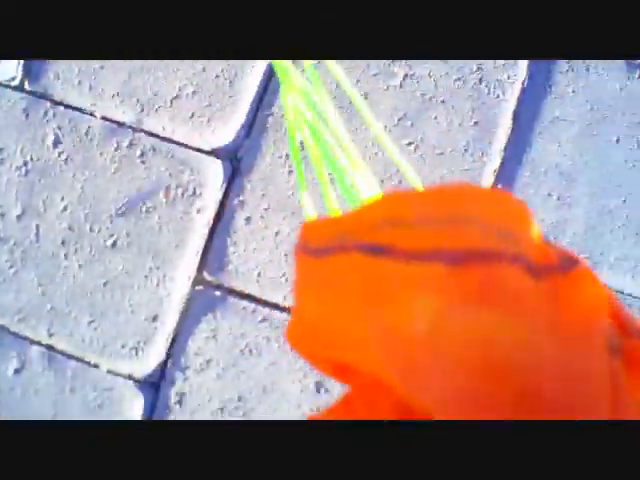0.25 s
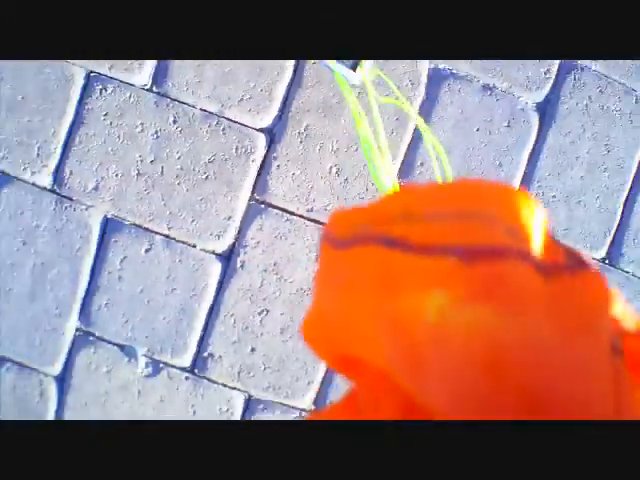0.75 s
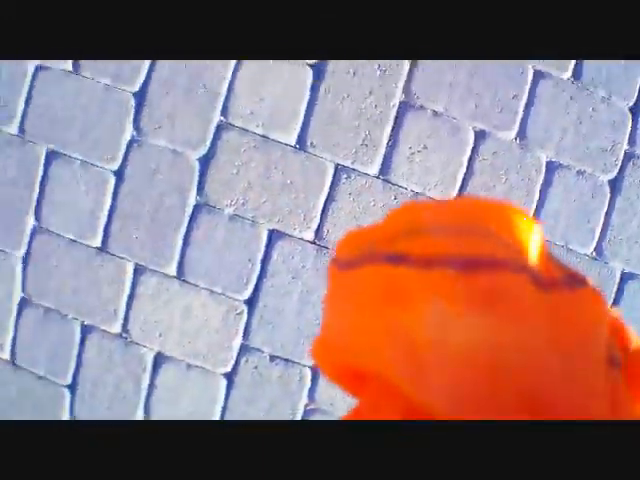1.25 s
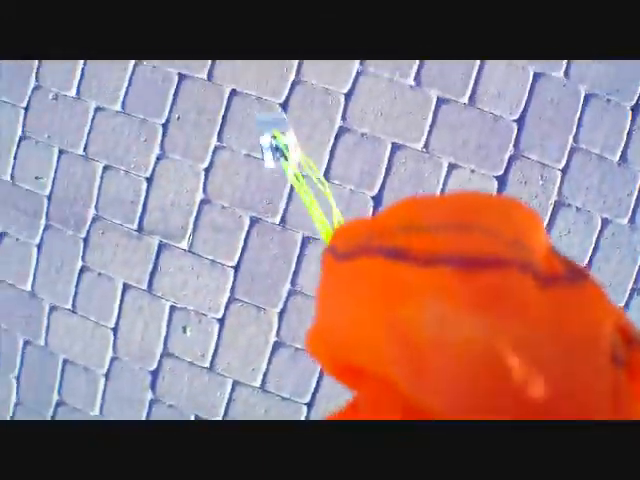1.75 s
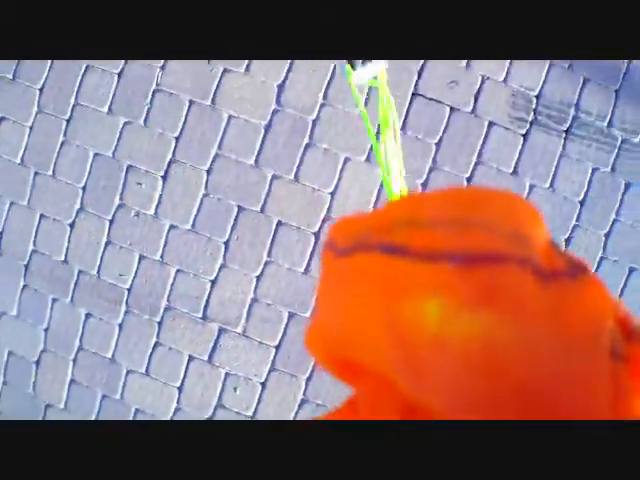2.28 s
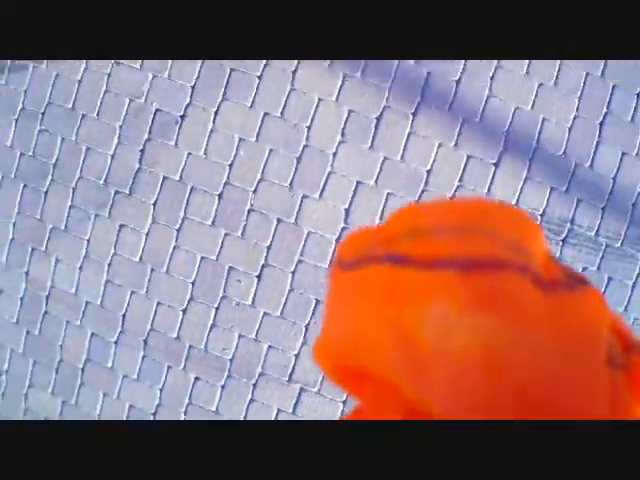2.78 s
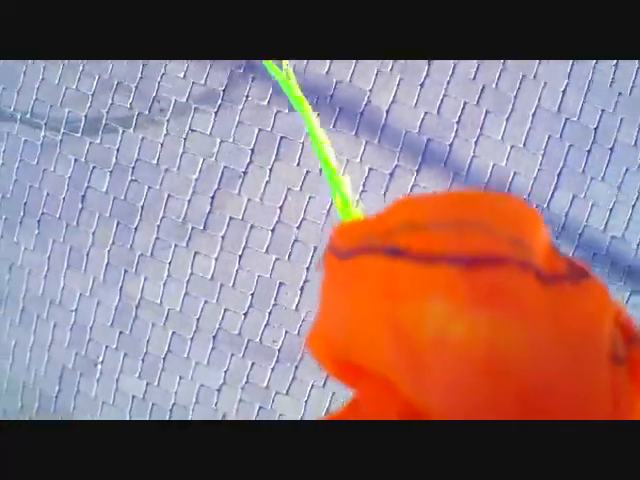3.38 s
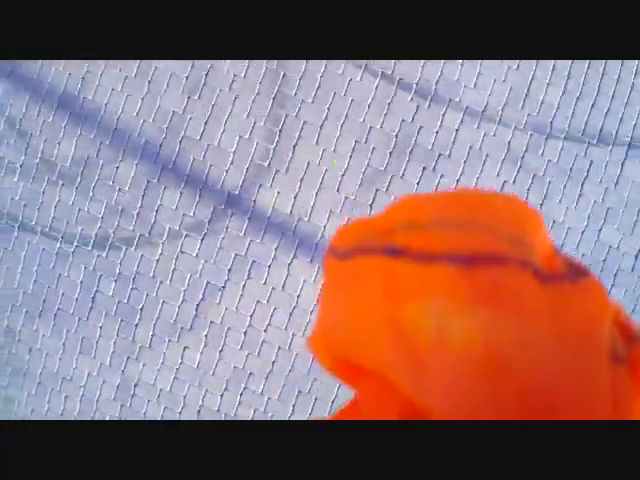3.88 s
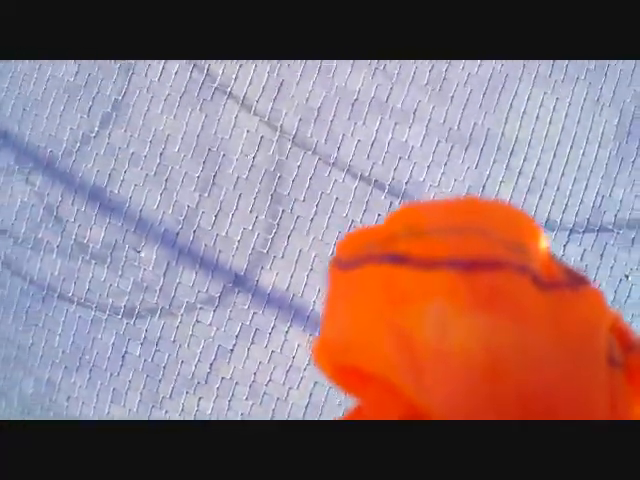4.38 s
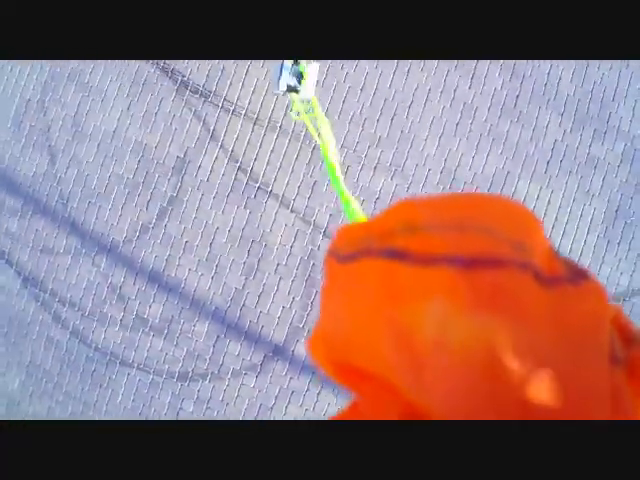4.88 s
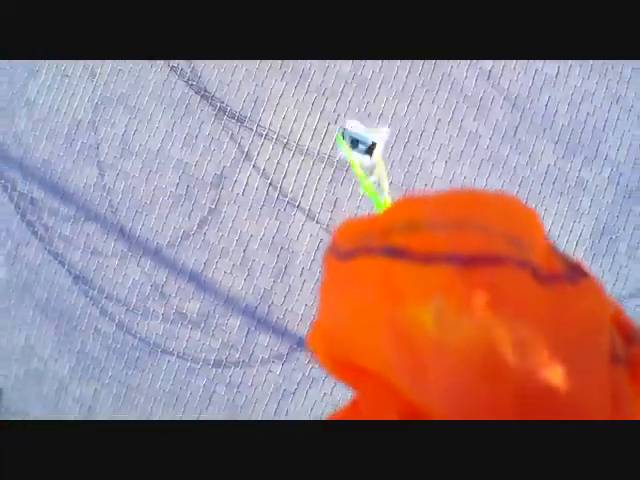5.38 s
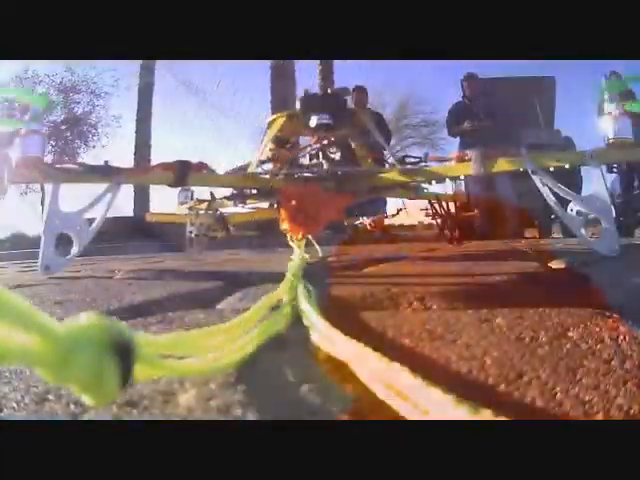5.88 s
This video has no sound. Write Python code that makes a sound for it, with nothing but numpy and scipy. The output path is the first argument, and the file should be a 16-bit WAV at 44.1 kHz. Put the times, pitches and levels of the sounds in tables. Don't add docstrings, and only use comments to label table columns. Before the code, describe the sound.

Close drone rotors buzz in wavering, beating tones under a thin electronic whistle, before fading into dull, overloaded wind noise at the end.

```python
import sys
import numpy as np
from scipy import signal
from scipy.fft import rfft, irfft
from scipy.io import wavfile
from scipy.ndimage import uniform_filter1d, map_coordinates

SR = 44100
rng = np.random.default_rng(int(sys.argv[2]) if len(sys.argv) > 2 else 0)


def level_to_linear(level):
    exponent = np.asarray(level, float) / 20
    return 10 ** exponent


def generate_wav(signal):
    frames = np.transpose(np.atleast_2d(signal))
    scaled = np.clip(frames, -1, 1) * 32767
    pcm = np.round(scaled).astype(np.int16)
    wavfile.write(sys.argv[1], SR, pcm)


N = 271079
TIME = np.arange(N) / SR


def rms_one(x):
    return x / np.sqrt(np.mean(x ** 2) + 1e-20)


def in_time(rows):
    seconds, *columns = np.transpose(rows)
    return [np.interp(TIME, seconds, column) for column in columns]


def drift(rate):
    points = rng.standard_normal(4000)
    return map_coordinates(points, [5 + TIME * 2 * rate], order=2)


def coloured(points):
    hz, db = np.transpose(points)
    bins = np.arange(N // 2 + 1) * SR / N + 1
    gain = level_to_linear(np.interp(np.log(bins), np.log(hz), db))
    return rms_one(irfft(rfft(rng.standard_normal(N)) * gain, N))


def split_band(x, kind, hz, order=2):
    return signal.sosfilt(signal.butter(order, hz, kind, fs=SR, output="sos"), x)


def shaft_speeds():
    # (time [s], shaft speed [rev/s])
    near_speed = [(0, 80.8), (.35, 81.8), (.55, 86.2), (.72, 85.4), (.97, 88.2), (1.28, 83.2), (1.9, 83.3),
                  (2.3, 90.1), (2.65, 90), (2.96, 87.8), (3.17, 89.9), (3.42, 88.5), (3.87, 91.7),
                  (4.2, 89.5), (4.85, 86.6), (5.22, 90.1), (5.55, 89.7), (6.15, 87.7)]
    # (time [s], shaft speed [rev/s])
    slow_speed = [(0, 76.6), (.3, 78), (.78, 78.3), (.98, 75.5), (1.4, 81.2), (1.7, 82.2), (2, 81.7),
                  (2.2, 80.5), (2.5, 81.1), (2.7, 80.1), (3.13, 85.6), (3.5, 85.6), (3.72, 83.1), (4, 81.3),
                  (4.85, 83.2), (5.3, 82.3), (5.52, 81.3), (6.15, 82.1)]
    # (time [s], shaft speed [rev/s])
    far_speed = [(0, 82.2), (.22, 83.5), (.68, 81.1), (1.3, 85.9), (1.5, 85.5), (1.83, 86.9), (2.17, 84.4),
                 (2.8, 86.5), (3.15, 89.6), (3.45, 90.7), (3.7, 90.4), (3.87, 89), (4.1, 90.1), (4.5, 88.6),
                 (4.83, 86.8), (5.2, 87.3), (5.5, 89.8), (6.15, 87.7)]
    return [in_time(rows)[0] for rows in (near_speed, slow_speed, far_speed)]


def turns(rev_per_s, unsteady):
    speed = uniform_filter1d(rev_per_s, size=4000) * (1 + unsteady * drift(25))
    return 2 * np.pi * np.cumsum(speed) / SR


def strong_tones(angles, speeds, flutter_db, swell_db):
    whine_tones = [(0, 10), (0, 11), (0, 13), (0, 14), (0, 15), (1, 13), (1, 13), (0, 42), (1, 42), (2, 42)]
    # (centre [Hz], width [Hz], level on top [dB])
    arm_peaks = [(904, 96, -58.5), (928, 140, -57.5), (1221, 163, -39), (1236, 136, -44.5),
                 (1265, 81, -43.5), (1005, 99, -47), (1103, 77, -46.5), (3564, 426, -47),
                 (3605, 218, -40.5), (3590, 210, -52)]
    out = np.zeros(N)
    for (rotor, multiple), (hz, width, db) in zip(whine_tones, arm_peaks):
        off_centre = (multiple * speeds[rotor] - hz) / (width / 2)
        tuned = 1 / (1 + off_centre ** 2)
        level = level_to_linear(db + flutter_db * drift(10) + swell_db * drift(2.51))
        out += level * tuned * np.sin(multiple * angles[rotor] + np.pi / 2 * multiple ** 2)
    return np.sqrt(2) * out


def rotor_tones(angles, flutter_db):
    # (multiple [per turn], near [dB], slow [dB], far [dB])
    shaft_tones = [(1, -84.5, -83.5, -91), (2, -78.5, -77, -64.5), (3, -102, -96, -86), (4, -80, -97, -74),
                   (5, -74, -79, -73.5), (6, -77.5, -104, -104), (7, -76.5, -115, -104),
                   (9, -77, -87, -100), (10, -86, -91, -79), (11, -90, -110, -100), (12, -104, -86, -89),
                   (13, -99, -99, -101), (14, -99, -62, -69.5), (15, -99, -66.5, -61.5),
                   (16, -63.5, -74, -97), (17, -62.5, -85, -102), (18, -63.5, -76, -68),
                   (19, -74, -64, -66), (21, -66, -108, -60.5), (27, -81, -93, -83), (28, -64, -100, -74),
                   (56, -73, -72.5, -83)]
    flutters = [level_to_linear(flutter_db * drift(7)) for _ in range(9)]
    out = np.zeros(N)
    for i, (multiple, *levels_db) in enumerate(shaft_tones):
        for k, (angle, db) in enumerate(zip(angles, levels_db)):
            tone = np.sin(round(multiple) * angle + i * i + k)
            out += np.sqrt(2) * level_to_linear(db) * flutters[(i + 3 * k) % 9] * tone
    return out


def rear_rotor(flutter_db):
    # (time [s], shaft speed [rev/s])
    rear_speed = [(0, 81), (.3, 82.5), (.7, 86), (1.1, 86.5), (1.4, 84.6), (1.7, 86.9), (2.1, 87.5),
                  (2.5, 90.4), (3, 87), (3.5, 91.2), (3.9, 89), (4.15, 89.3), (4.5, 87), (5.1, 87),
                  (5.4, 89), (6.15, 88)]
    rear_levels = [-67.5, -72.5, -65, -73.5]
    angle = turns(in_time(rear_speed)[0], unsteady=0.001)
    tones = [level_to_linear(db + flutter_db * drift(5)) * np.sin(multiple * angle)
             for multiple, db in enumerate(rear_levels, start=2)]
    return np.sqrt(2) * sum(tones)


def tooth_tones(angle, rev_per_s, upper_db, lower_db):
    # centre [rev/s], width [rev/s]
    lock_speed = (80.45, .62)
    locked = np.exp(-((rev_per_s - lock_speed[0]) / lock_speed[1]) ** 4)
    return locked * (level_to_linear(upper_db) * np.sin(55 * angle) + level_to_linear(lower_db) * np.sin(53 * angle))


def whistles(angles, effort_db, flutter_db):
    # (start pitch [Hz], sag [Hz/s])
    switching_tones = [
        (8049, 3.4),
        (7706.5, 2.4),
        (7688, 2.5),
    ]
    # (time [s], spacing [Hz])
    pair_spacing = [(0, 11), (.6, 4), (1.35, 2.8), (1.5, .9), (3.5, .8), (3.65, 4), (4.5, 4), (5.1, 6.5),
                    (6.15, 7.5)]
    # (whistle [index], rotor [index], multiple [per turn], level [dB])
    mixing_tones = [(3, 0, 42, -63), (0, 2, 42, -69), (2, 2, 14, -70), (2, 2, 2, -85), (2, 2, -1, -74),
                    (3, 2, -2, -76), (1, 2, 1, -78), (3, 1, -2, -80), (0, 2, 1, -68), (3, 2, 2, -78),
                    (3, 2, 3, -74), (3, 2, 4, -75), (0, 2, -1, -79)]
    levels_db = -47, -54.5, -51.5, -53
    effort_share = 0.95
    pair_silent_s, pair_pull = 2.5, 0.85

    high, pair, low = [2 * np.pi * np.cumsum(hz - sag * TIME + 0.5 * drift(4)) / SR
                       for hz, sag in switching_tones]
    apart = np.pi * np.cumsum(in_time(pair_spacing)[0]) / SR
    apart += np.pi / 2 - apart[int(pair_silent_s * SR)]
    apart -= pair_pull * np.sin(2 * apart) / 2
    phases = high, pair + apart, pair - apart, low
    out = np.zeros(N)
    for db, phase in zip(levels_db, phases):
        out += level_to_linear(db + effort_share * effort_db + flutter_db * drift(3.6)) * np.sin(phase)
    out += level_to_linear(-57.5 + 1.5 * drift(1.5)) * np.sin(phases[1] - 42 * angles[1])
    for controller, rotor, multiple, db in mixing_tones:
        mixed = phases[round(controller)] - round(multiple) * angles[round(rotor)]
        out += level_to_linear(db + drift(1.3)) * np.sin(mixed)
    return np.sqrt(2) * out


def climb_effort():
    # (time [s], level [dB])
    climb_levels = [(0.0, -42.5), (0.32, -43), (0.77, -43.5), (0.99, -46), (1.3, -43), (2.68, -45.5),
                    (3.06, -46), (4.26, -45.5), (4.72, -44.5), (5.5, -45.5)]
    return in_time(climb_levels)[0]


def rattle(angles, spread_db, decay_s):
    ticks = np.zeros(N)
    for angle in angles:
        passes = np.flatnonzero(np.diff(np.floor(angle / np.pi)))
        blade_db = np.where(np.arange(len(passes)) % 2, -5.0, 0.0)
        chance = np.minimum(rng.exponential(1, 2000)[:len(passes)], 2.1)
        ticks[passes] += level_to_linear(blade_db + spread_db * chance)
    r = np.exp(-1 / (decay_s * SR))
    return rms_one(signal.lfilter([1], [1, -2 * r, r * r], ticks * level_to_linear(1.2 * drift(5))))


def air(angles, level_db, tick_share, patchy_db, split_hz):
    # (frequency [Hz], level [dB per Hz])
    air_colour = [(30, -35), (100, -23), (300, -19), (650, -24), (950, -5.5), (1300, 3.5), (1600, 3),
                  (2900, -5.5), (5000, -10), (7000, -17), (11000, -20), (15500, -20.5)]
    chop = 1 - tick_share + tick_share * rattle(angles, spread_db=5.2, decay_s=0.0011)
    low = split_band(coloured(air_colour), "low", split_hz)
    high = split_band(coloured(air_colour), "high", split_hz)
    hiss = high * rms_one(chop * level_to_linear(patchy_db * drift(30)))
    return level_to_linear(level_db) * (low * level_to_linear(1.4 * drift(12)) + hiss)


def frame(x):
    # (centre [Hz], width [Hz], lift over the plain response [dB])
    frame_peaks = [(1164, 333, 5.5), (1790, 18, -23.5), (2050, 340, -0.5), (2685, 600, 4), (2880, 37, -27),
                   (3620, 204, 14.5), (3800, 180, 2), (4220, 160, -7), (4720, 360, 9), (4940, 110, -6.5),
                   (7880, 1020, 10), (9750, 900, -0.5), (10300, 620, 6.5), (12600, 900, 2)]
    for hz, width, lift_db in frame_peaks:
        turn_cos, g = -2 * np.cos(2 * np.pi * hz / SR), np.sqrt(level_to_linear(lift_db))
        a = np.tan(np.pi * width / SR) * g ** 0.5
        x = signal.lfilter([1 + a * g, turn_cos, 1 - a * g], [1 + a / g, turn_cos, 1 - a / g], x)
    return x


def downwash():
    aloft_db, ground_db, fade_s = -66.5, -51.5, 0.71
    level_db = aloft_db + (ground_db - aloft_db) * np.exp(-TIME / fade_s)
    rumble = coloured([(30, -3), (150, -5.5), (330, 5.5), (520, 7.5), (800, 9), (1500, -15.5)])
    return level_to_linear(level_db + 1.3 * drift(8)) * rumble


def wind(droop_hz, top_hz, full_db):
    # (time [s], level [dB])
    wind_levels = [(5.53, -49), (5.68, -32), (5.85, -26.5), (5.875, -29.5), (5.98, -30.5), (5.99, -27),
                   (6.02, -26.5), (6.147, -27)]
    # (frequency [Hz], level [dB per Hz])
    gust_colour = [(20, -26), (35, -6), (48, 2), (110, -3), (170, -8), (300, -24), (1000, -60)]
    flap_db, = in_time(wind_levels)
    drive_db = 6.5 - 0.082 * (flap_db + 40)
    fine_db = -38 + (flap_db + 30)
    flap = coloured([(100, -29), (220, 3.5), (480, -2.0), (800, -30.0), (1500, -35)])
    fine = coloured([(300, -40), (900, 8.0), (2000, -4.5), (3500, -11.5), (5000, 2.5)])
    gust = level_to_linear(drive_db + 4.7 * drift(15)) * coloured(gust_colour)
    gust += level_to_linear(flap_db + 25.0 + 4.4 * drift(30)) * flap
    gust += level_to_linear(fine_db + 33.0 + 2.9 * drift(70)) * fine
    limited = gust / (1 + np.abs(gust) ** 8) ** (1 / 8)
    limited = split_band(limited, "high", droop_hz, order=1)
    limited = signal.sosfilt(signal.cheby2(10, 50, top_hz, fs=SR, output="sos"), limited)
    return level_to_linear(full_db) * limited


def scene():
    speeds = shaft_speeds()
    angles = [turns(speed, unsteady=0.00073) for speed in speeds]
    air_db = climb_effort()
    through_frame = rotor_tones(angles, flutter_db=4.0)
    through_frame += air(angles, air_db, tick_share=0.85, patchy_db=1.3, split_hz=5400)
    drone = frame(through_frame)
    drone += strong_tones(angles, speeds, flutter_db=0.8, swell_db=0.7)
    drone += whistles(angles, air_db - air_db.mean(), flutter_db=0.54)
    drone += tooth_tones(angles[1], speeds[1], upper_db=-55.5, lower_db=-53)
    drone += rear_rotor(flutter_db=1.5)
    drone += downwash()
    round_at = 0.054
    drone = round_at * np.tanh(drone / round_at)
    fade_start_s, fade_end_s = 5.535, 6.3
    fade = np.clip((TIME - fade_start_s) / (fade_end_s - fade_start_s), 0, 1)
    mix = (1 - fade) * drone + fade * wind(droop_hz=4, top_hz=4200, full_db=-10.3)
    return mix[None]


def band_limit(x):
    return signal.sosfilt(signal.butter(12, 15480, fs=SR, output="sos"), x)


def record(dry):
    cut = signal.sosfilt(signal.ellip(12, 0.3, 60, 15260, fs=SR, output="sos"), dry)
    return band_limit(cut)


dry = scene()
out = record(dry)
generate_wav(out)
```